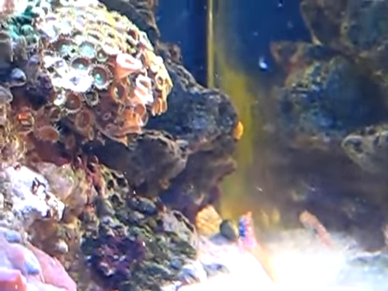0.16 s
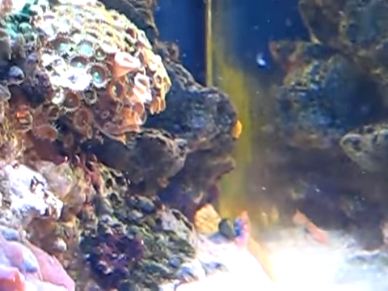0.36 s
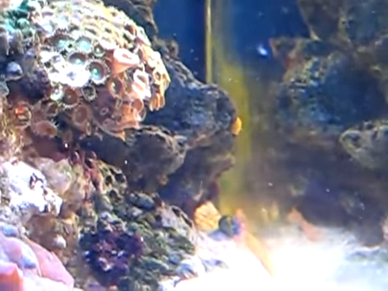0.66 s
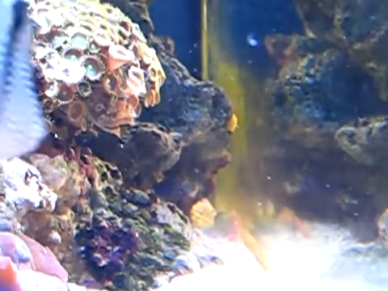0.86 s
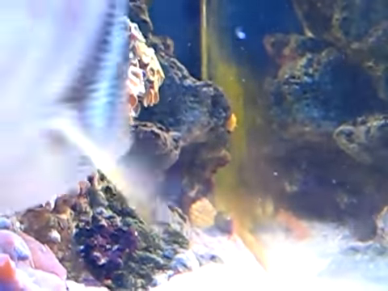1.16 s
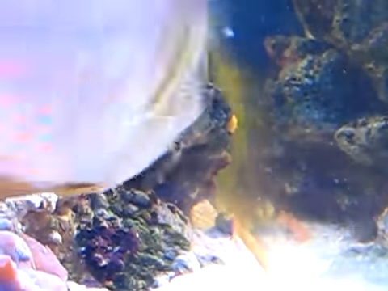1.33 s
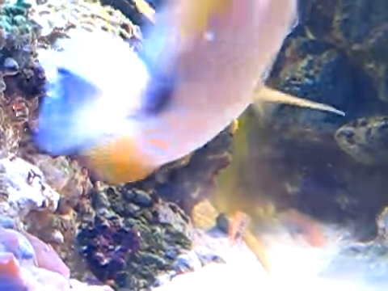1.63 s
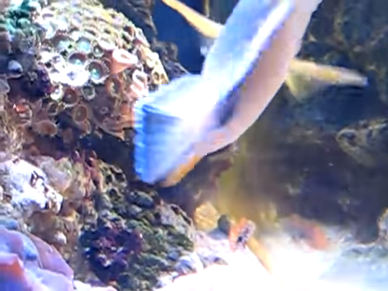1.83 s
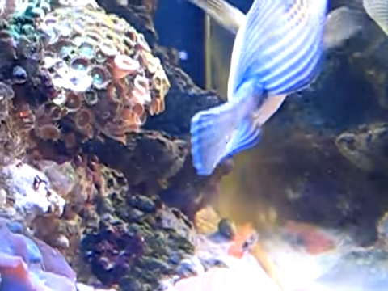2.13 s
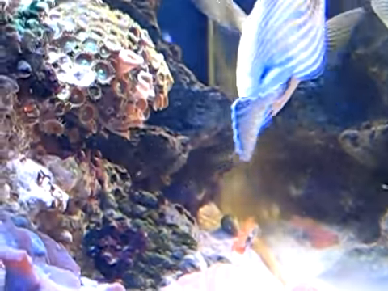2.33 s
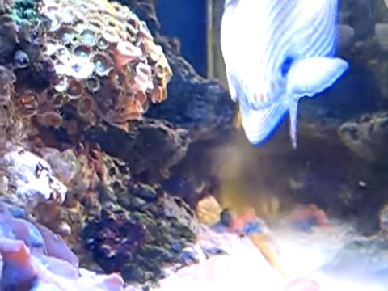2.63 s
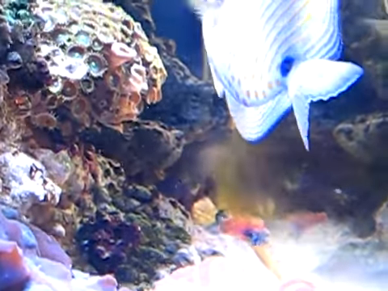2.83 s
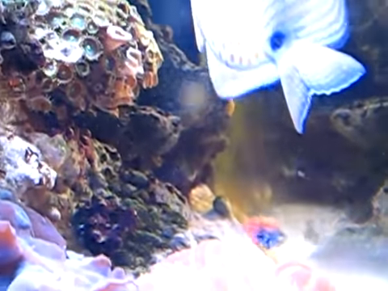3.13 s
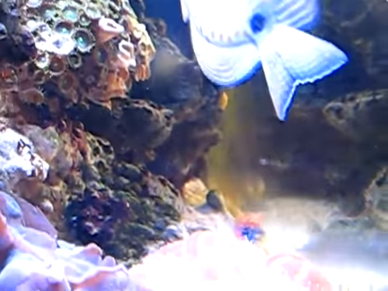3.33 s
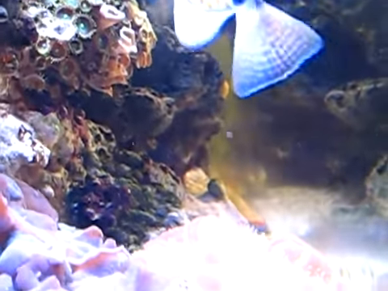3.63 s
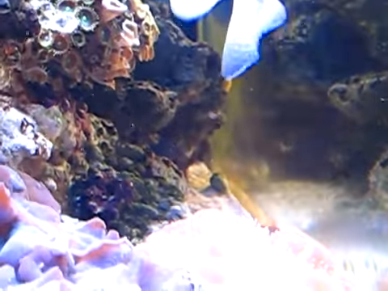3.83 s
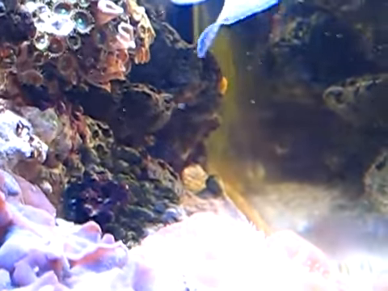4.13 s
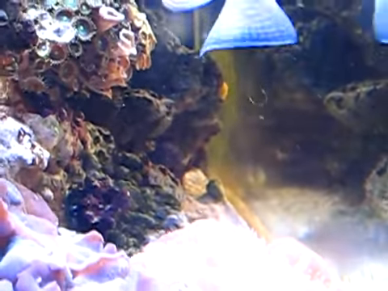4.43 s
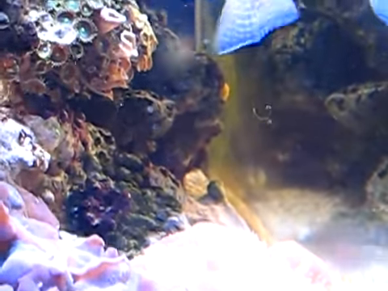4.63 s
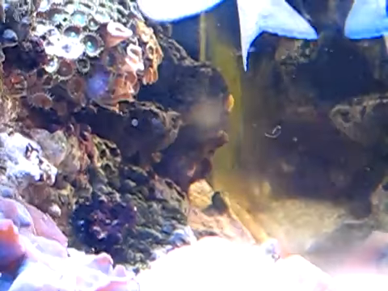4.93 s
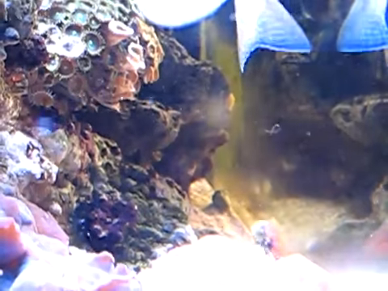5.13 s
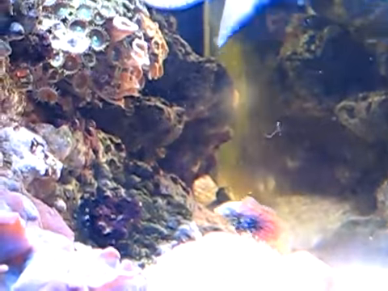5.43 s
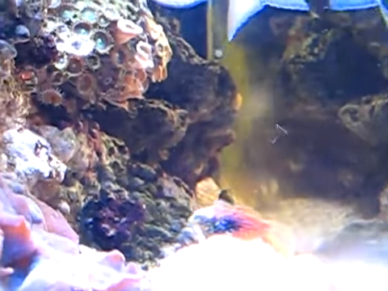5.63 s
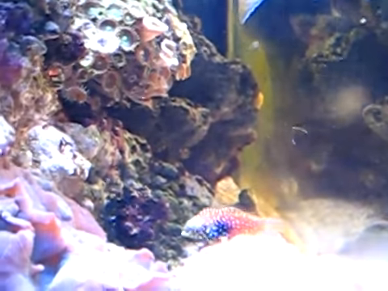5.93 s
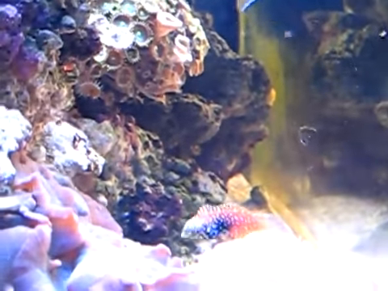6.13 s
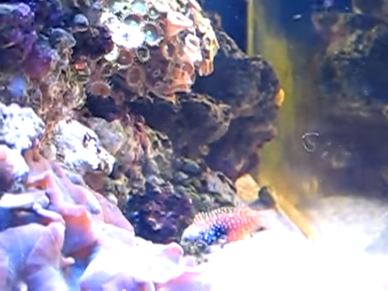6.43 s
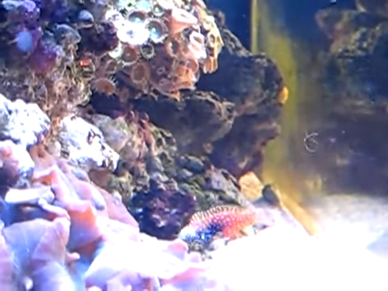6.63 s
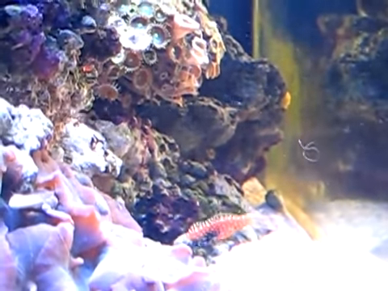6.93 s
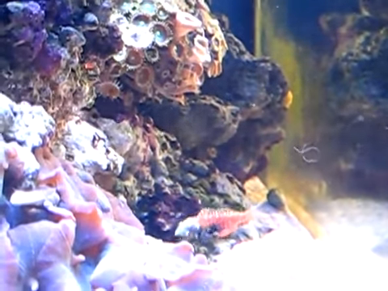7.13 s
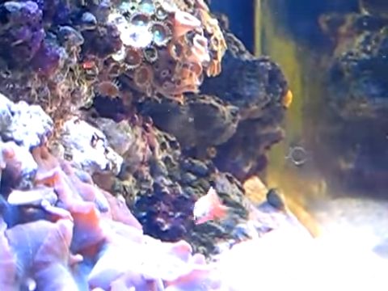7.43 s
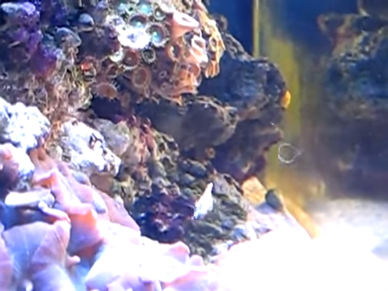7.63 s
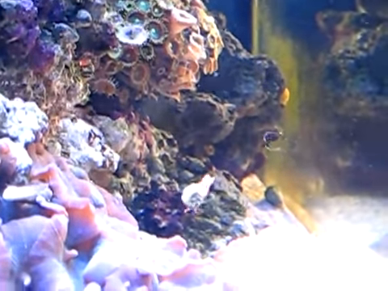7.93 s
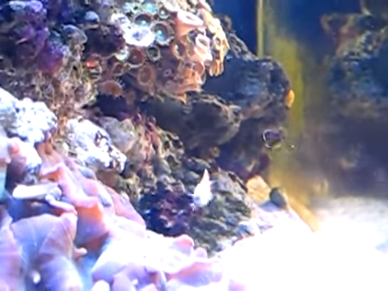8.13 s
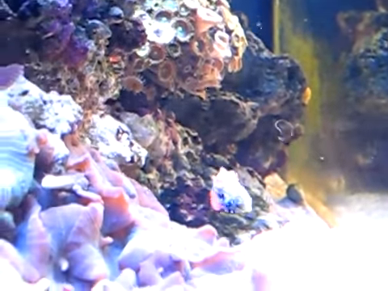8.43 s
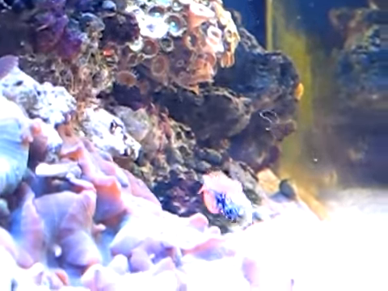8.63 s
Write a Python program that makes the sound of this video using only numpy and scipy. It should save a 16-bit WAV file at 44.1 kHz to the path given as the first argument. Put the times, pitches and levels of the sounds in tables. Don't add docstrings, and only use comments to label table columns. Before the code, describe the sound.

A reef tank with fish runs steadily indoors. After a brief rumbling flurry of knocks, the low electrical pump hum and rushing water stay constant, with a very faint thin whine from the lamps. Scattered bubbles burst and gulp, a drop smacks sharply around two seconds, and a small bright knock comes mid-way. Near the end the glass is tapped once. Close, slightly gritty small-camera sound.

```python
import sys
import numpy as np
from scipy import signal
from scipy.fft import rfft, irfft, next_fast_len
from scipy.io import wavfile
from scipy.ndimage import uniform_filter1d

SR = 44100
rng = np.random.default_rng(int(sys.argv[2]) if len(sys.argv) > 2 else 0)


def natural_amplitude(level_db):
    exponent = np.asarray(level_db, float) / 20
    return 10 ** exponent


def pcm_store(signal):
    levels = np.round(np.clip(np.atleast_2d(signal), -1, 1) * 32767)
    wavfile.write(sys.argv[1], SR, levels.astype(np.int16).T)


N = 387638
T = np.arange(N) / SR
MAINS_HZ = 59.947

# t/s, f/Hz, peak level/dB
BUBBLES = [(0.314, 1980, -37), (6.004, 1900, -39), (1.412, 3410, -35), (2.059, 4340, -34),
           (2.092, 1800, -35), (2.455, 844, -38), (2.297, 1760, -31), (2.398, 1840, -38),
           (3.374, 3700, -33), (3.907, 970, -37), (3.908, 2190, -41), (3.938, 1233, -38),
           (4.016, 1174, -32), (4.071, 897, -30), (4.178, 2470, -33.5), (4.272, 3500, -35.5),
           (4.285, 1210, -37), (4.466, 3170, -28.5), (5.625, 2560, -39), (6.003, 4170, -31.5),
           (6.004, 2590, -39), (6.412, 1700, -36), (6.597, 2540, -35), (6.742, 1870, -36),
           (7.14, 3570, -33), (7.358, 4300, -30), (7.721, 3610, -32), (7.84, 2610, -38), (8.617, 1900, -35),
           (8.689, 2500, -35)]
# t/s, peak level/dB
PIPE_GULPS = [(1.234, -35), (1.576, -30.5), (1.886, -35), (2.191, -35), (2.448, -33), (2.684, -35),
              (3.898, -37), (4.395, -33.5), (4.665, -34.5), (5.933, -34), (6.006, -35), (7.367, -33.5),
              (7.542, -37), (8.492, -37)]


def unit(x):
    return x / np.sqrt(np.mean(x ** 2))


def walk(rate):
    steps = rng.standard_normal(int(N / SR * rate) + 2)
    knots = uniform_filter1d(np.repeat(steps, 8), size=8)
    return 1.2 * np.interp(T * rate * 8, np.arange(len(knots)), knots)


def add(out, s, sound):
    i = int(s * SR)
    out[i:i + len(sound)] += sound[:N - i]


def ring(hz, db, t60, attack_s, glide=0, waver=0):
    t = np.arange(int((t60 + .01) * SR)) / SR
    turns = hz * t * (1 + glide * t / t60)
    if np.ndim(waver):
        turns = turns + waver[:len(t)]
    envelope = (1 - np.exp(-t / attack_s)) * natural_amplitude(-60 * t / t60)
    return -natural_amplitude(db) * envelope * np.sin(2 * np.pi * turns)


def room(x, wet_db=-2, t60=0.2):
    t = T[:SR // 3]
    tail = rng.standard_normal(SR // 3) * natural_amplitude(-60 * t / t60) * (t > .004)
    tail = tail / np.sqrt(np.sum(tail ** 2))
    return x + natural_amplitude(wet_db) * signal.fftconvolve(x, tail)[:N]


def surge():
    # t/s, level/dB
    flow = [(0.35, -35.5), (1.19, -33), (1.34, -35), (3.43, -35), (3.5, -35), (3.73, -36), (4.09, -33.5),
            (4.84, -35), (6.67, -34), (6.84, -34.5), (8.32, -36.5), (8.58, -32), (8.79, -38)]
    s, db = np.transpose(flow)
    return np.interp(T, s, db - np.mean(db))


def lamps():
    whines_hz = (3403.99, 4762.47, 3083.63)
    offset_rows = [
        (0, -.5, .5, 1),
        (-5, -4, -3, -2, -1, 0, 1, 2),
        (-4, -2, 0, 1),
    ]
    level_rows = [
        (-53.5, -70, -72, -73),
        (-69, -72.5, -71, -67, -66, -64, -75, -65.5),
        (-72.5, -73.5, -71, -72.5),
    ]
    fades_db = (.8, 2.2, 2.2)
    out = 0
    for hz, offsets, levels_db, fade_db in zip(whines_hz, offset_rows, level_rows, fades_db):
        for offset, db in zip(offsets, levels_db):
            turns = (hz + offset * MAINS_HZ) * T + rng.random()
            out = out + natural_amplitude(db + fade_db * walk(1.6)) * np.sin(2 * np.pi * turns)
    return np.sqrt(2) * out


def pump():
    # f/multiples of the mains, rms level/dB, wobble/dB
    hum_orders = [(1.995, -39, 0), (4.006, -50, 4), (5.03, -52.5, -1), (6.01, -41, 0.44), (7.03, -66, -1),
                  (9.03, -53, 3), (10, -46, 1.7), (11, -59.5, 1), (12, -48, 3.5), (13, -66, 0.5),
                  (19, -68, -0.5), (27, -60, 3), (28, -66.5, 2.5)]
    # t/s, rms level/dB
    shake = [(0, -61), (1.2, -60.5), (1.8, -72), (2.8, -69), (3.7, -57), (8.8, -60.5)]
    pulse_s = .0013
    turn = 2 * np.pi * MAINS_HZ * (T - pulse_s)
    hum = natural_amplitude(np.interp(T, *np.transpose(shake))) * np.sin(turn)
    for order, db, wobble_db in hum_orders:
        k = round(order)
        quarters = k % 2 - (k == 4)
        level = natural_amplitude(db + wobble_db * np.minimum(walk(9), 1))
        hum = hum - level * np.cos(k * turn + quarters * np.pi / 2)
    return np.sqrt(2) * hum


def wash(level_db=-35.5, fizz_db=-15, size_db=2.5, count=2500, splash_share=.3):
    # f/Hz, level/dB per Hz
    colour = [(20, -15.5), (70, -18.5), (100, -10.5), (150, -12.5), (190, -6), (330, -4.5), (650, -3.5),
              (900, -9), (1500, -9.5), (2200, -11), (2900, -15), (3500, -12.5), (4400, -15.5), (5600, -20)]
    # f/Hz, width/Hz, level/dB
    cabinet = [(162.4, 17, 7.5), (202, 24, 7.5), (249.3, 23.4, 11), (303, 23, 5.5), (447, 26, 5.5),
               (540, 17, -0.5), (676, 40, 2), (959, 76, 5), (1147, 13, 4), (1390, 110, 2.5),
               (3300, 150, 1.5)]
    size = next_fast_len(N)
    hz = np.maximum(np.arange(size // 2 + 1) * SR / size, 1)
    colour_hz, density_db = np.transpose(colour)
    colour_db = np.interp(np.log(hz), np.log(colour_hz), density_db)
    for f, width, db in cabinet:
        colour_db = colour_db + db / (1 + (2 * (hz - f) / width) ** 2)

    where, sign, big = rng.random((count, 3)).T
    spray = np.zeros(size)
    spray[(where * N).astype(int)] = np.sign(sign - .5) * natural_amplitude(-size_db * np.log(big))
    fizz_swell = np.interp(np.arange(size), np.arange(N), natural_amplitude(2.2 * walk(6)))
    fizz = natural_amplitude(fizz_db) * unit(spray) * fizz_swell
    rush = rfft(rng.standard_normal(size))
    spectrum = natural_amplitude(colour_db) * (rush + np.clip(hz / 2000, 0, 1) * rfft(fizz))

    surge_db = surge()
    out, shared = 0, walk(26)
    for step in range(9, 26):
        mask = np.cos(np.pi / 4 * np.clip(np.log2(hz) * 4 - 2 * step, -2, 2)) ** 2
        high = np.clip((step / 2 - np.log2(500)) / 1.6, 0, 1)
        shared = 0.77 * shared + .6 * walk(9)
        flicker_db = (0.56 + 0.46 * high) * shared + 0.64 * high * walk(22)
        swell_db = (0.5 - high + splash_share * high) * surge_db
        out = out + irfft(spectrum * mask, size)[:N] * natural_amplitude(flicker_db + swell_db)
    return natural_amplitude(level_db) * unit(out)


def ticks(splash_db=1, splash_s=.008):
    # t/s, peak level/dB, length/s
    lid_drops = [
        (2.058, -19, 0.0044),
        (2.065, -34, .003),
        (4.266, -30, .003),
        (6.013, -34, .005),
        (7.357, -40, 0.0034),
        (7.721, -30, 0.0035),
        (7.138, -30, .003),
        (8.464, -25.5, .004),
    ]
    splashes = [(row[0], row[-1] + splash_db, splash_s) for row in BUBBLES + PIPE_GULPS]
    out = np.zeros(N)
    for s, db, length in lid_drops + splashes:
        crack = np.diff(uniform_filter1d(rng.standard_normal(2001), size=5))
        add(out, s, natural_amplitude(db) * unit(crack) * np.exp(-T[:2000] / length) / 2)
    return out


def plops(glide=0.0082, count=520):
    gulp_hz, gulp_cycles = 1366, 49
    bubble_cycles = 76
    crowd_level_db, spread_db, per_surge, tilt_db = -46.5, 2.5, 1.2, -2.5
    waver = .13 * walk(300)

    when, pitch, big, life = rng.random((count, 4)).T
    crowd_hz = 1000 * natural_amplitude(13.5 * pitch)
    crowd_db = crowd_level_db + tilt_db * pitch - spread_db * np.log(big + 0.027)
    crowd_db = crowd_db + per_surge * surge()[(when * N).astype(int)]
    crowd_t60 = np.minimum(.02 + .043 * life, 110 / crowd_hz)
    crowd = zip(when * N / SR, crowd_hz, crowd_db, crowd_t60)

    clear = [(s, hz, db, bubble_cycles / hz) for s, hz, db in BUBBLES]
    gulps = [(s, gulp_hz, db, gulp_cycles / gulp_hz) for s, db in PIPE_GULPS]
    out = np.zeros(N)
    for s, hz, db, t60 in [*clear, *gulps, *crowd]:
        add(out, s, ring(hz, db + 6.5, t60, 0.00079, glide, waver[int(.9 * s * SR):]))
    return out


def knocked_parts():
    # t/s, f/Hz, peak level/dB, t60/s
    parts = [(0.127, 445, -24, 0.081), (.1315, 763, -22.5, 0.083), (0.136, 195, -16, .07),
             (.146, 1300, -26, 0.045), (.149, 747, -18.5, 0.092), (.163, 280, -17, 0.036),
             (0.1801, 213, -9, 0.051), (.182, 521, -19.5, 0.097), (.195, 820, -26, .07),
             (.201, 241, -21, .09), (.213, 313, -20, 0.086), (.222, 423, -30, 0.044),
             (4.4637, 3300, -21, 0.025), (8.465, 685, -26, 0.043), (8.465, 1100, -25, 0.03),
             (8.5, 660, -27, 0.055), (8.2106, 1190, -29, 0.017)]
    out = np.zeros(N)
    for s, hz, db, t60 in parts:
        add(out, s, ring(hz, db, t60, 0.58 / hz))
    return out


def rubs():
    # t/s, length/s, rms level/dB, centre f/Hz
    rub_events = [(.13, 0.15, -31, 466), (.135, .12, -29.5, 208), (0.139, 0.087, -40.5, 1700),
                  (0.249, 0.11, -34, 337), (1.342, 0.25, -43.5, 1300), (1.557, 0.056, -37.5, 500),
                  (2.183, 0.034, -41, 1300), (2.442, 0.086, -39, 350), (3.902, 0.23, -41.5, 1200),
                  (4.035, 0.13, -37, 404), (4.266, 0.049, -36, 900), (5.195, 0.062, -36.5, 510),
                  (6.255, 0.087, -47, 3500), (6.404, 0.043, -41, 2500), (4.05, 0.1, -41, 209),
                  (8.479, 0.086, -37.5, 220), (6.003, .03, -39, 2200), (4.013, 0.037, -42, 1400),
                  (6.481, .05, -39, 60), (6.728, 0.069, -39.5, 1400), (7.36, 0.028, -39, 2500),
                  (5.169, .12, -43.5, 1300), (6.4, .05, -47, 3400), (7.72, .03, -50, 3300),
                  (8.4, 0.026, -40, 900), (8.459, 0.12, -39, 450), (8.461, 0.05, -38, 1100)]
    t = T[:SR // 2]
    out = np.zeros(N)
    for s, length, db, hz in rub_events:
        band = signal.butter(3, [hz / 2.0, hz * 1.95], "band", fs=SR, output="sos")
        rub = signal.sosfilt(band, rng.standard_normal(SR // 2))
        envelope = np.clip(t / 0.0097, 0, 1) * np.exp(-(t / length) ** 3)
        add(out, s, natural_amplitude(db) * unit(rub) * envelope)
    return out


def glass_tap():
    # t/s, peak level/dB, contact time/s
    contact = (8.2079, -10, .0005)
    # f/Hz, peak level/dB, t60/s
    pane = [
        (790, -20.5, 0.024),
        (1180, -20, 0.026),
        (1700, -23, 0.011),
        (2730, -25.5, 0.011),
    ]
    s, db, contact_s = contact
    out = np.zeros(N)
    push = np.r_[np.hanning(int(contact_s * SR)), np.zeros(999)]
    spring = signal.butter(1, 350, "high", fs=SR, output="sos")
    add(out, s, -natural_amplitude(db) * signal.sosfilt(spring, push))
    for hz, mode_db, t60 in pane:
        add(out, s + 1.2 * contact_s, ring(hz, mode_db, t60, .3 / hz))
    return out


def knocks():
    bass_cut = signal.butter(2, 110, "high", fs=SR, output="sos")
    return signal.sosfilt(bass_cut, knocked_parts() + rubs() + glass_tap())


def scene():
    steady = lamps() + pump() + wash()
    water = room(plops() + ticks())
    close = room(knocks(), wet_db=-15.5, t60=0.28)
    return (steady + water + close)[None]


def top_cut(x):
    return signal.sosfilt(signal.butter(12, 7280, fs=SR, output="sos"), x)


def record(dry):
    rate_hz, offset = 11024., -.0037
    limit = signal.ellip(10, .1, 80, rate_hz / 2 + 25, fs=SR, output="sos")
    held = signal.sosfiltfilt(limit, dry)
    mirrored = held * (1 + 2 * np.cos(2 * np.pi * rate_hz * T))
    soft = signal.firwin(numtaps=63, cutoff=rate_hz / 2, window=("kaiser", 8.5), fs=SR)
    mix = signal.fftconvolve(mirrored, soft[None], "same") + offset
    return top_cut(mix)


dry = scene()
out = record(dry)
pcm_store(out)
```